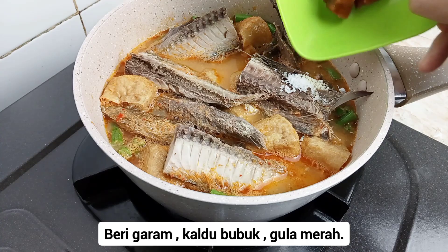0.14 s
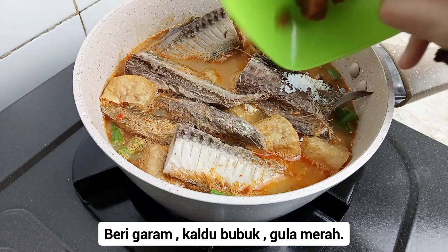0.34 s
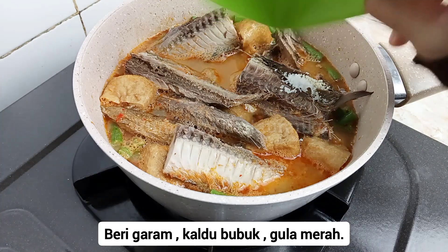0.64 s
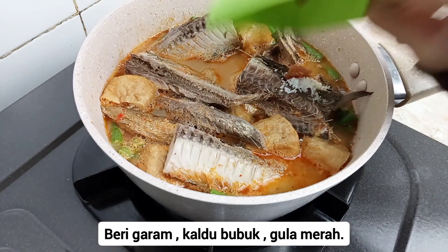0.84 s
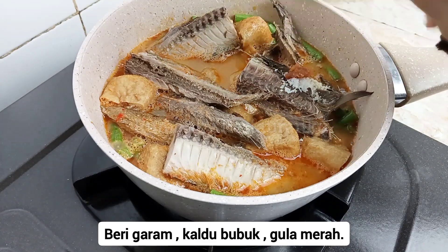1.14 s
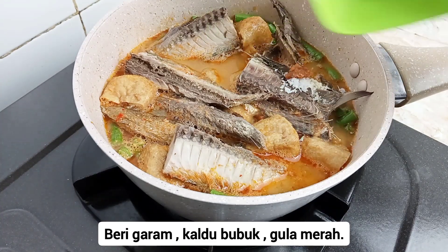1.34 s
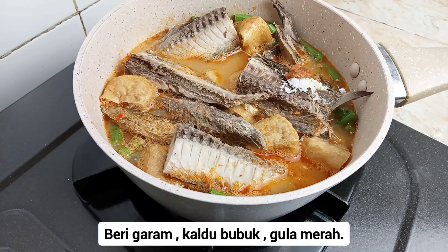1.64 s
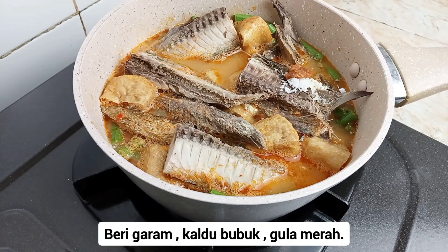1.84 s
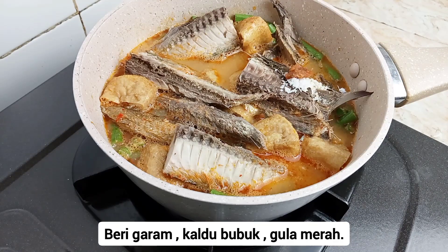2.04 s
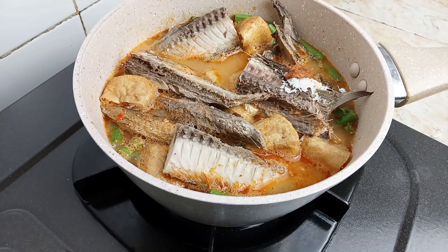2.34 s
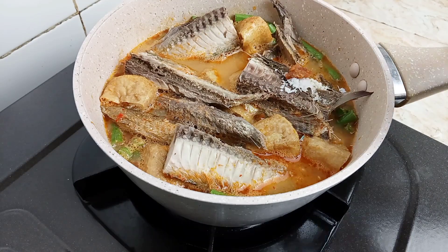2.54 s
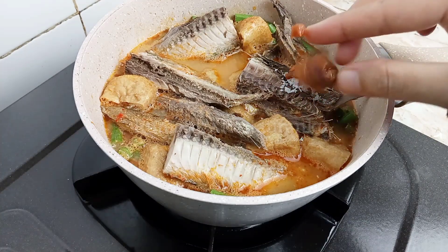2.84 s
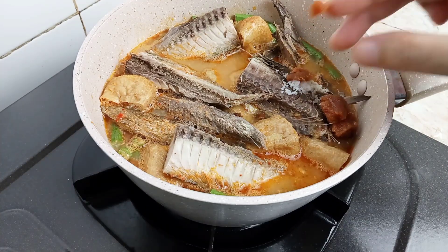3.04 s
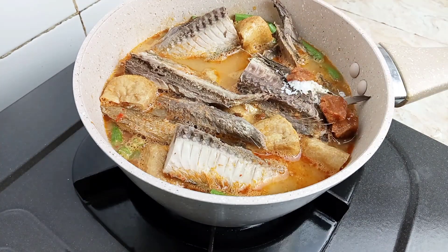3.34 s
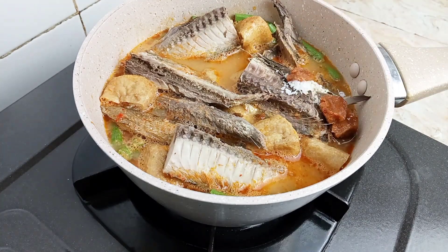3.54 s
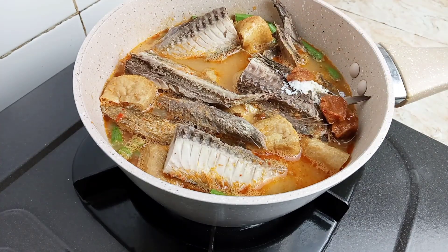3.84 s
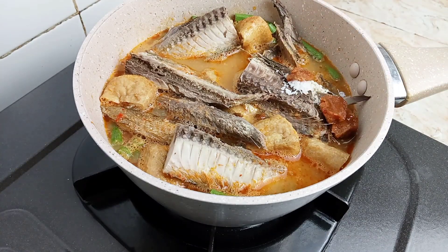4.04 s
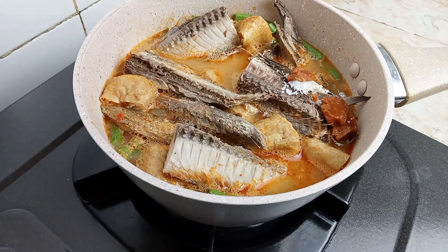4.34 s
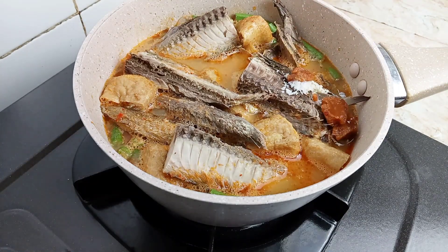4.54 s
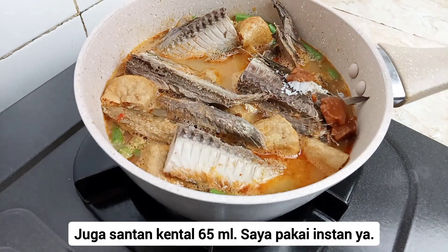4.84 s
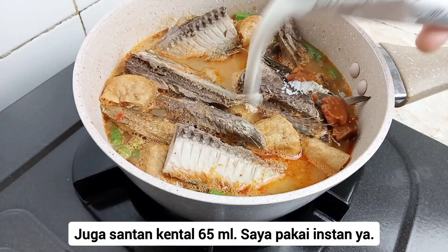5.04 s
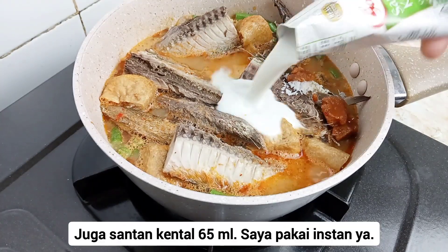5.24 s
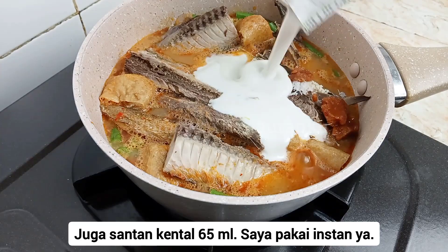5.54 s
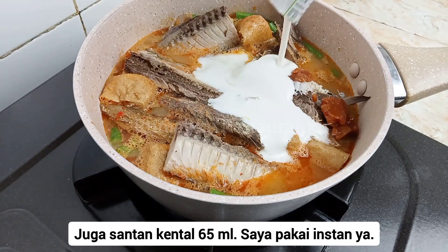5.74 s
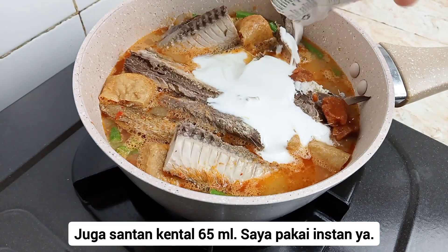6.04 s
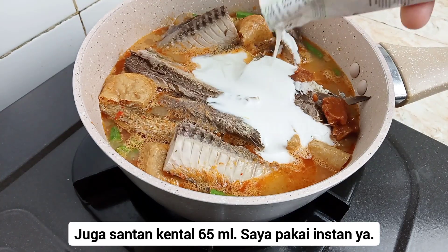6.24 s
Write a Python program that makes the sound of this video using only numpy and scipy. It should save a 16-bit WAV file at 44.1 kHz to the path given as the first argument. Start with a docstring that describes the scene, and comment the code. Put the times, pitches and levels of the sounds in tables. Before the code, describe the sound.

Broth simmers quietly in a pan for about six seconds, heard close in a small kitchen. A faint, low gas flame rumble and soft hiss grow slightly, dotted with small, dry ticks of bursting bubbles. At about 1.6 seconds a dull tap sounds as a packet snaps and rustles, fading by 2.1. A few very soft thuds and ticks come around 3 seconds. At 3.9 a larger bubble gives a clear, pitched plop with a few smaller ones right behind it. The whole sound dips briefly at 4.1. A softer plop follows at 4.5, with barely audible crinkling. At 5.3 comes the loudest event, one hard knock of kitchenware with a clank that rings for about half a second. The packet rustles lightly again around 6 seconds while the simmer carries on.

```python
"""Broth ticks, fizzes and now and then plops as it simmers in a pan over a low gas flame.
Small bubbles crack as their films burst; larger ones ring. Beside the pan a packet rustles and
snaps as its creases give way. The level dips briefly at 4.1 s; at 5.3 s one hard knock of
kitchenware rings through the small kitchen."""
import sys
import numpy as np
from scipy import signal
from scipy.fft import rfft, irfft, next_fast_len
from scipy.io import wavfile

SR = 44100
rng = np.random.default_rng(int(sys.argv[2]) if len(sys.argv) > 2 else 0)


def transcribe(u):
    """Save the signal u as a 16-bit wav file named by the first command-line argument.

    u: samples, shape (n,) or (channels, n), limited to [-1, 1]; the rate is SR.
    q: integer samples, one column per channel.
    """
    v = np.clip(np.atleast_2d(u).T, -1, 1)
    q = np.round(v * 32767).astype(np.int16)
    wavfile.write(sys.argv[1], SR, q)


N = 281358
TIME = np.arange(N) / SR

# larger bubbles (time [s], level [dB], pitch [Hz], crack level [dB])
LARGE_BUBBLES = [(3.876, -17.5, 1544, -43), (3.8998, -38, 1580, -44.5), (3.9083, -32, 1540, -46.5),
                 (3.9517, -36, 1500, -71), (4.537, -36, 870, -63)]
# spectrum of fizz and packet crackle (frequency [Hz], relative density [dB])
CRACKLE_SPECTRUM = [(3500, -22.5), (4500, -13.5), (5500, -8.5), (6600, -4.5), (7400, 5.5), (8500, -5.5),
                    (10000, -10), (12500, -13), (15300, -7), (17000, -12)]
# knock and rebound (time [s], level [dB])
KNOCK_HITS = [(5.3036, -7.5), (5.3102, -24)]


def burst(crack_db, hz, splash_db, band_ratio=1.103):
    """A bursting film: dry high crack, then a splash of thud, hollow ring and spray."""
    chirp = amp(crack_db - 4) * bubble(hz, swell_s=.0003, t60_s=.003, glide=.03)
    crack = amp(crack_db - 7) * puff(hz / band_ratio, hz * band_ratio, swell_s=.00053, t60_s=.014)
    thud = amp(3.5) * puff(800, 2700, swell_s=.00037, t60_s=.016)
    hollow = amp(3.5) * puff(3100, 3820, swell_s=.0004, t60_s=.013)
    spray = amp(-14.5) * puff(9500, 17000, swell_s=.00051, t60_s=.011)
    return chirp + crack + amp(splash_db) * (thud + hollow + spray)


def ticks(strays_per_s=2.5, spread_db=6):
    """Films burst on clear small bubbles, on the larger ones and on faint random strays."""
    # (time [s], crack level [dB], pitch [Hz], splash level [dB])
    small_bubbles = [(0.3567, -46, 7540, -67.5), (0.412, -55, 7360, -64), (0.459, -56, 6860, -60.5),
                     (0.536, -57.5, 7600, -74), (0.94, -65, 6500, -67), (.9557, -64, 7300, -61.5),
                     (1.244, -55.5, 6900, -77), (1.3334, -68, 6570, -56), (1.5914, -59, 7500, -60),
                     (2.3996, -54, 6900, -73), (3.012, -48.5, 7400, -61.5), (3.046, -51, 7100, -70),
                     (3.1678, -52, 6040, -65), (3.5703, -54, 7470, -72), (3.6012, -59, 7300, -59),
                     (4.0595, -73, 7400, -56), (4.2988, -55, 7500, -73), (4.3854, -56, 7600, -68),
                     (4.578, -69, 7300, -57), (4.6199, -54.5, 7000, -62.5), (5.257, -50, 7190, -67),
                     (5.9048, -57.5, 7460, -59.5)]
    out = np.zeros(N)
    for s, crack_db, hz, splash_db in small_bubbles:
        add(out, s, burst(crack_db, hz, splash_db))
    for s, _, _, crack_db in LARGE_BUBBLES:
        add(out, s, burst(crack_db, hz=7600, splash_db=-58.5))
    for when, size in rng.random((round(strays_per_s * N / SR), 2)):
        size_db = spread_db * (2 * size - 1)
        add(out, when * (N - 1) / SR, burst(size_db - 63.5, hz=7400, splash_db=size_db - 76))
    return out


def plops(swell_cycles=1, ring_cycles=16):
    """Larger bubbles open with a faint click and ring for a few cycles."""
    out = np.zeros(N)
    for s, db, hz, _ in LARGE_BUBBLES:
        add(out, s, amp(db) * bubble(hz, swell_cycles / hz, ring_cycles / hz, glide=.017))
        add(out, s, amp(-57) * puff(2200, 3500, swell_s=.0005, t60_s=.042))
    return out


def simmer(rise_db_per_s=.5042):
    """Flame rumble, smooth hiss and the fizz of tiny bubbles, slowly gathering."""
    # both (frequency [Hz], relative density [dB])
    flame_spectrum = [(15, -53), (25, -16.5), (49, -17.5), (69, -3), (86, 2.5), (145, -0.5), (189, -7.5),
                      (249, 0), (321, -7), (357, -6.5), (403, -17), (442, -11), (600, -12), (780, -40.5),
                      (1320, -120)]
    hiss_spectrum = [(240, -32.5), (400, -3), (481, -10), (579, -6.5), (765, -2.5), (893, -4), (949, -4.5),
                     (2400, -11), (2590, -10.5), (3580, -11.5), (4950, -31.5), (7630, -22), (9320, -30),
                     (15000, -30), (16000, -31)]
    flame = amp(-68.5) * coloured(rng.standard_normal(N), flame_spectrum)
    hiss = amp(-73) * coloured(rng.standard_normal(N), hiss_spectrum)
    pops = np.abs(grains(per_s=45, spread_db=3.5))
    envelope = signal.fftconvolve(pops, pulse(swell_s=.0005, t60_s=.018))[:N]
    fizz = amp(-90) * coloured(envelope * rng.standard_normal(N), CRACKLE_SPECTRUM)
    return amp(rise_db_per_s * TIME) * (flame + hiss + fizz)


def hard_knock():
    """Struck kitchenware: damped body and short rough crack, returned apart."""
    # (frequency [Hz], level [dB], t60 [s])
    damped_modes = [(705, -19.5, .026), (914, -6.5, 0.041), (1139, 3.5, 0.019), (1340, -18.5, 0.017),
                    (1705, -9.5, 0.013), (2356, -12.5, 0.018), (3056, -5, 0.02), (3870, -21.5, 0.015)]
    body = struck(KNOCK_HITS, damped_modes, contact_s=.00037)
    crack = np.zeros(N)
    for s, db in KNOCK_HITS:
        add(body, s, amp(db - 22) * puff(1700, 2860, swell_s=.00036, t60_s=.029))
        add(crack, s, amp(db - 29.5) * puff(6220, 7420, swell_s=.0002, t60_s=.015))
    body = signal.sosfilt(signal.butter(6, 4400, fs=SR, output="sos"), body)
    return low_cut(low_cut(body, hz=507), hz=430), crack


def knock_ring(t60_share_at_1khz=.87):
    """The knock's lingering modes, damped more toward the treble."""
    # (frequency [Hz], level [dB], free t60 [s])
    free_modes = [(890, -3.5, .17), (955, -2.5, 0.41), (1042, -4, 0.39), (1058, 2.5, 0.2), (1090, -4, 0.57),
                  (1060, -4.5, .24), (1140, -10.5, 0.26), (1225, -1, .36), (1333, -5.5, 0.33),
                  (1300, -16.5, 0.24), (1930, -12, 0.25), (2205, -11, 0.21), (2880, -16, 0.2),
                  (3138, -12.5, .14), (3216, -9.5, 0.2)]
    modes = [(hz, db, t60_share_at_1khz * t60_s * (1000 / hz) ** .2) for hz, db, t60_s in free_modes]
    return amp(-19) * low_cut(struck(KNOCK_HITS[:1], modes, contact_s=.00296), hz=400)


def clatter():
    """The knock's rough clank: two main resonances and a wash between them."""
    out = np.zeros(N)
    s, db = KNOCK_HITS[0]
    low = amp(-22) * puff(880, 1400, swell_s=.003, t60_s=.17)
    high = amp(-34) * puff(3000, 3300, swell_s=.002, t60_s=.16)
    wash = amp(-35) * puff(1500, 3400, swell_s=.002, t60_s=.17)
    fade = np.linspace(1, 0, len(low)) ** .5
    add(out, s, amp(db) * (low + high + wash) * fade)
    return out


def packet(fall_ratio=1.71, rub_db=-17.5):
    """Squeezed creases give way in clumps of clicks, with light rubbing between and a few snaps."""
    # (time [s], level [dB])
    snaps = [(1.6195, -40), (1.624, -44.5), (1.681, -37)]
    # (frequency [Hz], level [dB], t60 [s])
    snap_modes = [(1593, -6.5, 0.044), (1890, 4, 0.012), (2500, -2, 0.0062), (3750, -6.5, 0.0075),
                  (7640, -18, .008)]
    # squeezes per handling (peak time [s], level [dB], rise width [s], relative crackle [dB])
    handlings = [
        [(1.6215, -43.5, 0.0041, -14), (1.706, -54, .014, -9), (1.834, -50, 0.012, -9.5),
         (1.985, -58.5, 0.036, -12.5)],
        [(4.452, -65.5, .018, -10.5), (4.622, -69, 0.0083, 0.5), (4.95, -74, 0.02, 1), (5.24, -75, 0.013, 1.5)],
        [(5.945, -64.5, 0.017, -4), (6.058, -62.5, 0.018, -6), (6.116, -53.5, 0.011, -9),
         (6.183, -66, 0.014, -1)],
    ]
    # spectrum per handling (frequency [Hz], relative density [dB])
    body_spectra = [
        [(200, 10), (600, -2), (1000, 4), (1600, 11), (2000, 2.5), (2600, -6), (3100, 2.5), (3600, 7),
         (4100, -9), (5000, -29)],
        [(1200, -16), (2600, 1.5), (3600, -1), (4500, -20.5)],
        [(200, -16), (600, -15), (1200, 0.5), (1900, -15.5), (2500, 1), (3100, -4.5), (3650, 5), (4100, -12.5),
         (5000, -25)],
    ]
    out = struck(snaps, snap_modes, contact_s=.0002)
    for squeezes, spectrum in zip(handlings, body_spectra):
        clumps = amp(2 * rms_one(band(rng.standard_normal(N), 25, 140)))
        creases = clumps * grains(per_s=7000, spread_db=2.2)
        held = (TIME > squeezes[0][0]) & (TIME < squeezes[-1][0])
        strongest_db = max(row[1] for row in squeezes)
        rub = held * amp(strongest_db + rub_db)
        body = crackle = 0
        for s, db, width_s, crackle_db in squeezes:
            body += swell(s, db, width_s, fall_ratio)
            crackle += swell(s, db + crackle_db, width_s, fall_ratio)
        out += np.maximum(body, rub) * coloured(creases, spectrum)
        out += np.maximum(crackle, amp(-11) * rub) * coloured(creases, CRACKLE_SPECTRUM)
    return out


def dull_taps():
    """A faint tap, then a stronger one, on quickly damped modes."""
    # (time [s], level [dB])
    hits = [(0.824, -54.5), (1.637, -23.5)]
    # (frequency [Hz], level [dB], t60 [s])
    modes = [(233, -27, 0.025), (496, -6, 0.024), (754, 4, 0.0072), (1160, -0.5, 0.0023),
             (3580, -16, 0.0092), (5940, -14.5, .004), (9660, -18.5, 0.01), (14300, -9.5, 0.0026)]
    return low_cut(struck(hits, modes, contact_s=.0001), hz=160)


def light_ping():
    """High modes ring just after the first clear burst."""
    # (time [s], level [dB])
    hits = [(.357, -55.5)]
    # (frequency [Hz], level [dB], t60 [s])
    modes = [(3340, -2, .09), (3570, -2.5, .12), (7800, 5, .05)]
    return struck(hits, modes, contact_s=.00031)


def clicks():
    """Pinprick clicks: top treble over a thin broad snap."""
    # (time [s], level [dB])
    pinpricks = [(.3564, -66), (.4589, -69), (.825, -61.5), (1.933, -63), (2.7296, -73), (3.012, -63),
                 (3.8758, -58.5), (4.8673, -64), (5.6217, -66.5), (6.0317, -69.5), (6.3096, -69.5)]
    out = np.zeros(N)
    for s, db in pinpricks:
        top = puff(9500, 17000, swell_s=.0005, t60_s=.011)
        snap = amp(-2) * puff(1500, 9000, swell_s=.0004, t60_s=.015)
        add(out, s, amp(db) * (top + snap))
    return out


def bumps(slosh_db=-55.5, period_s=.037, loss_db=1.5):
    """Soft low thuds, the strongest under the knock; the broth rocks after the biggest plop."""
    # (time [s], level [dB])
    low_thuds = [(.827, -61.5), (1.845, -61), (2.929, -64.5), (3.006, -60), (3.036, -56.5), (5.305, -47),
                 (5.608, -63)]
    slosh = [(LARGE_BUBBLES[0][0] + k * period_s, slosh_db - k * loss_db) for k in range(6)]
    out = np.zeros(N)
    for s, db in low_thuds + slosh:
        add(out, s, amp(db) * puff(67, 340, swell_s=.003, t60_s=.14))
    return out


def swishes():
    """Soft swells of noise that fade more slowly than they come."""
    # (peak time [s], level [dB], rise width [s])
    events = [(0.45, -60, 0.033), (1.345, -60.5, .028), (1.987, -67, 0.039), (2.903, -65.5, 0.053),
              (3.797, -62, .018), (4.741, -64, 0.025), (6.28, -62, 0.021)]
    # (frequency [Hz], relative density [dB])
    spectrum = [(300, -14), (600, -7), (820, -0.5), (1120, 0.5), (1300, -3.5), (1550, -7), (2500, -10.5),
                (3600, -16.5), (5000, -31.5), (6600, -26), (10000, -33.5)]
    envelope = sum(swell(s, db, width_s, fall_ratio=1.95) for s, db, width_s in events)
    return envelope * coloured(rng.standard_normal(N), spectrum)


def echoes(x):
    """Hob and wall tiles throw the sound back."""
    # (delay [s], level [dB])
    reflections = [(.0036, -14), (.0088, -12), (0.0119, -12.5), (.027, -15), (.039, -23.5)]
    out = np.zeros(N)
    for delay_s, db in reflections:
        add(out, delay_s, amp(db) * x)
    return out


def kitchen(x, paths=24):
    """Sound circles between the walls on paths of unrelated length, fading and scattering."""
    # (frequency [Hz], t60 [s])
    decay = [(150, 0.45), (600, 0.37), (1100, 0.43), (2000, 0.42), (3200, 0.4), (7500, 0.33), (15000, .17)]
    # (frequency [Hz], relative level [dB])
    colour = [(100, 0), (300, -1.5), (550, -1), (850, 0), (1200, -3.5), (1600, -6), (2200, 1), (3200, -5),
              (5000, -4.5), (7500, -2.5), (15000, -2)]
    size = next_fast_len(SR)
    hz = np.arange(size // 2 + 1) * SR / size
    t60_s = at_hz(decay, hz)
    response = 0
    for k in range(paths):
        path_s = .012 + .046 * (k * k * np.sqrt(2) % 1)
        round_trip = amp(-60 * path_s / t60_s) * np.exp(-2j * np.pi * hz * path_s)
        response += (-1) ** k * np.sqrt(path_s) * round_trip / (1 - round_trip)
    for scatter_s in (.00073, .00171, .00293):
        lag = np.exp(-2j * np.pi * hz * scatter_s)
        response *= (lag - .6) / (1 - .6 * lag)   # all-pass
    tail = irfft(response * amp(at_hz(colour, hz)), size)
    return signal.fftconvolve(x, tail / np.sqrt(np.sum(tail ** 2)))[:N]


def dip(start_s=4.121, fall_s=.0026, recovery_s=.17, depth_db=24.5):
    """The level drops at once and climbs steadily back."""
    since_s = TIME - start_s
    fall = np.clip(since_s / fall_s, 0, 1)
    remaining = np.clip(1 - since_s / recovery_s, 0, 1)
    return amp(-depth_db * fall * remaining)


def bubble(hz, swell_s, t60_s, glide):
    """A damped sine whose pitch creeps up as the bubble opens."""
    pitch_hz = hz * (1 + glide * np.minimum(TIME[:SR // 10] / t60_s, 1))
    return pulse(swell_s, t60_s) * np.sin(2 * np.pi * np.cumsum(pitch_hz) / SR)


def struck(hits, modes, contact_s):
    """Each hit rings all modes; the contact takes a moment to build."""
    t, out = TIME[:SR], np.zeros(N)
    ringing = sum(amp(db - 60 * t / t60_s) * np.sin(2 * np.pi * hz * t) for hz, db, t60_s in modes)
    for s, db in hits:
        add(out, s, amp(db) * ringing * (1 - np.exp(-t / contact_s)))
    return out


def puff(low_hz, high_hz, swell_s, t60_s):
    """Brief burst of band noise."""
    return rms_one(band(rng.standard_normal(SR // 10), low_hz, high_hz)) * pulse(swell_s, t60_s)


def grains(per_s, spread_db):
    """Random clicks of uneven size."""
    sizes = amp(spread_db * np.minimum(rng.exponential(1, N), 4)) * rng.choice([-1, 1], N)
    return sizes * (rng.random(N) < per_s / SR)


def pulse(swell_s, t60_s):
    """Swell-and-decay envelope, 0.1 s long, peak 1."""
    t = TIME[:SR // 10]
    shape = (1 - np.exp(-t / swell_s)) ** 2 * amp(-60 * t / t60_s)
    return shape / shape.max()


def swell(peak_s, db, width_s, fall_ratio):
    """Bell-shaped gain; the fall is fall_ratio times as long as the rise."""
    sigma_s = width_s * np.where(TIME > peak_s, fall_ratio, 1)
    return amp(db) * np.exp(-((TIME - peak_s) / sigma_s) ** 2 / 2)


def coloured(x, spectrum):
    """Impose a spectrum that falls steeply past its ends; rms 1."""
    size = next_fast_len(N)
    hz = np.maximum(np.arange(size // 2 + 1) * SR / size, 1)
    skirts = np.minimum(1, np.minimum(hz / spectrum[0][0], spectrum[-1][0] / hz)) ** 4
    return rms_one(irfft(rfft(x, size) * amp(at_hz(spectrum, hz)) * skirts, size)[:N])


def band(x, low_hz, high_hz):
    """Causal band-pass."""
    return signal.sosfilt(signal.butter(2, [low_hz, high_hz], "band", fs=SR, output="sos"), x)


def low_cut(x, hz):
    """Small things radiate little bass."""
    return signal.sosfilt(signal.butter(2, hz, "high", fs=SR, output="sos"), x)


def at_hz(points, hz):
    """Read a table on a log-frequency axis."""
    points = np.array(points)
    return np.interp(np.log(np.maximum(hz, 1)), np.log(points[:, 0]), points[:, 1])


def add(out, start_s, sound):
    """Mix a sound in at a time."""
    start = round(start_s * SR)
    out[start:start + len(sound)] += sound[:N - start]


def amp(db):
    """Decibels to gain."""
    return 10 ** (np.asarray(db) / 20)


def rms_one(x):
    """Scale to rms 1."""
    return x / np.sqrt(np.mean(x ** 2) + 1e-20)


def scene():
    """Direct sound, near echoes and room, all under the dip; mono."""
    body, crack = hard_knock()
    knock = body + crack
    ticking = ticks() + clicks()
    plopping, rustle, taps = plops(), packet(), dull_taps()
    near = echoes(amp(-.5) * ticking + amp(-1) * plopping + amp(-2.5) * knock + amp(-5) * taps)
    room = kitchen(amp(-12) * ticking + amp(-17.5) * plopping + amp(-15) * knock
                   + amp(-11) * clatter() + amp(-15.5) * rustle + amp(-20.5) * taps)
    broth = ticking + plopping + simmer()
    background = taps + light_ping() + swishes() + bumps()
    kitchenware = knock + knock_ring() + clatter()
    direct = broth + kitchenware + rustle + background
    return (dip() * (direct + near + room))[None]


def record(dry, cutoff_hz=15700):
    """Steep treble cut."""
    return signal.sosfilt(signal.ellip(10, .1, 70, cutoff_hz, fs=SR, output="sos"), dry)


dry = scene()
out = record(dry)
transcribe(out)
```